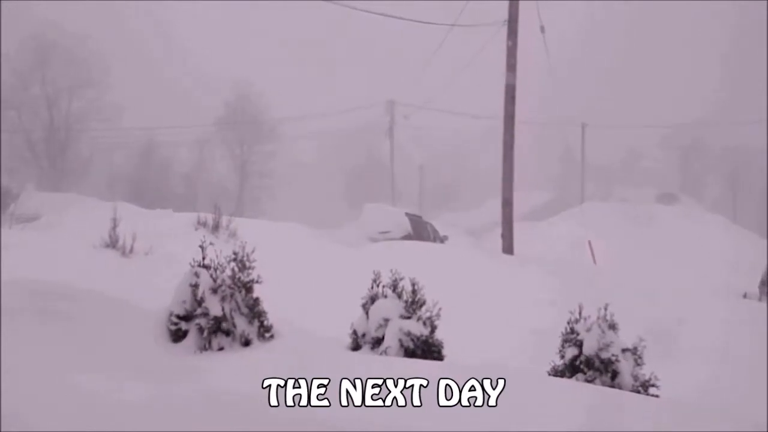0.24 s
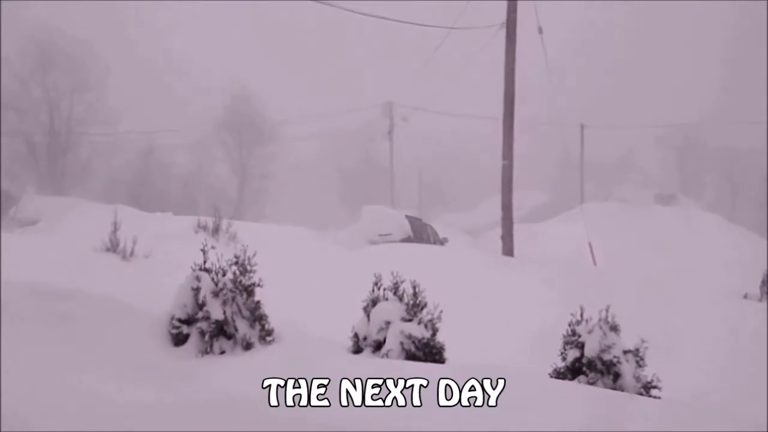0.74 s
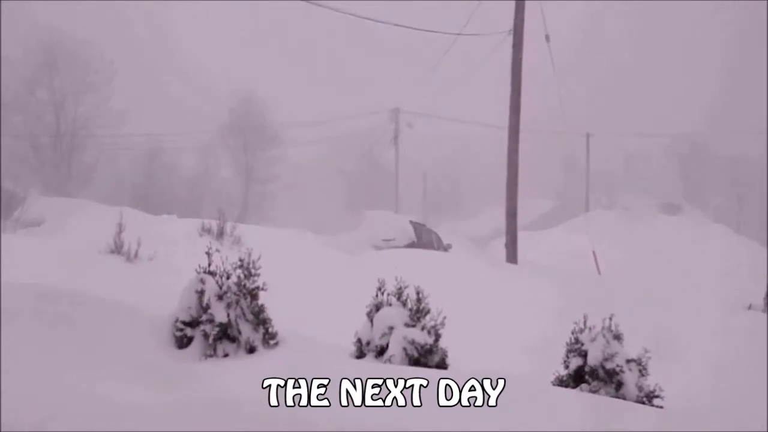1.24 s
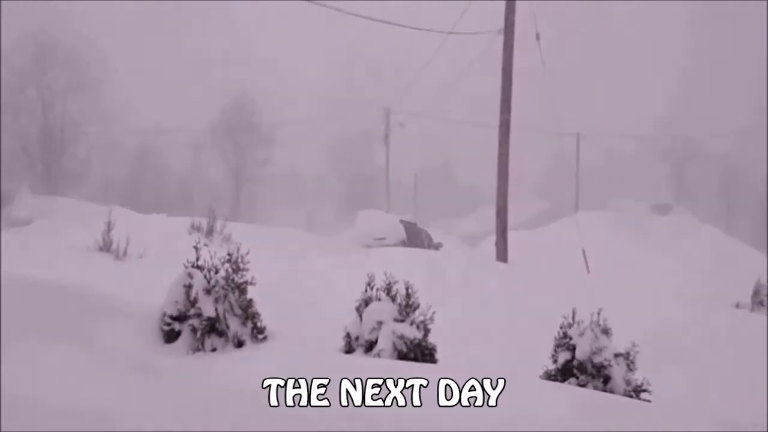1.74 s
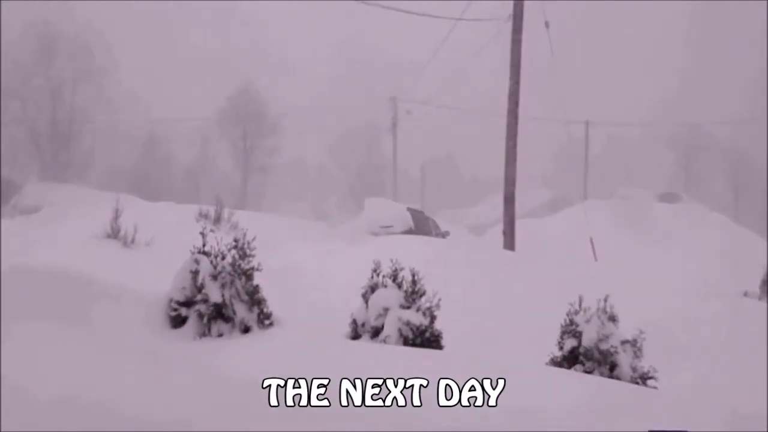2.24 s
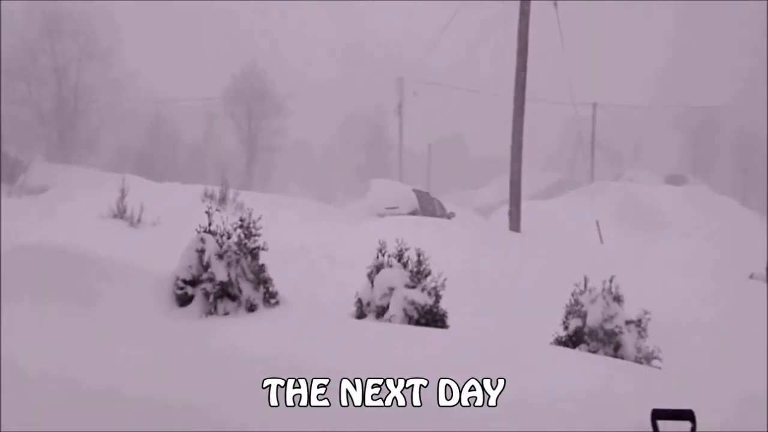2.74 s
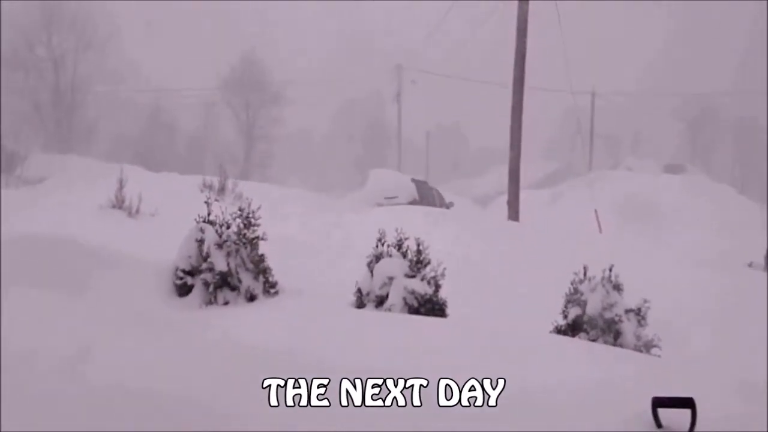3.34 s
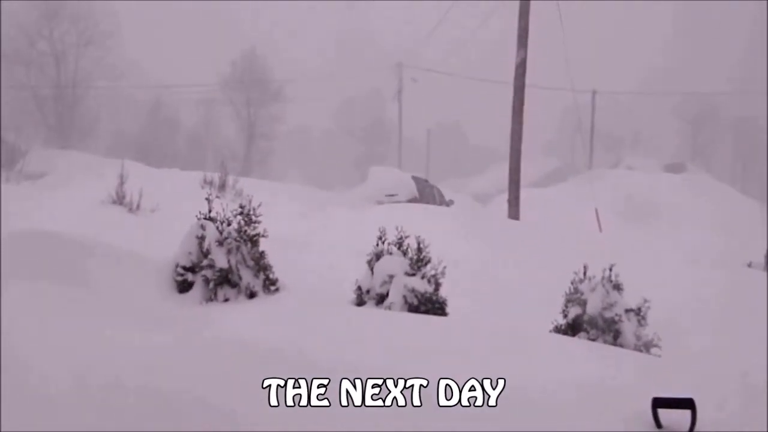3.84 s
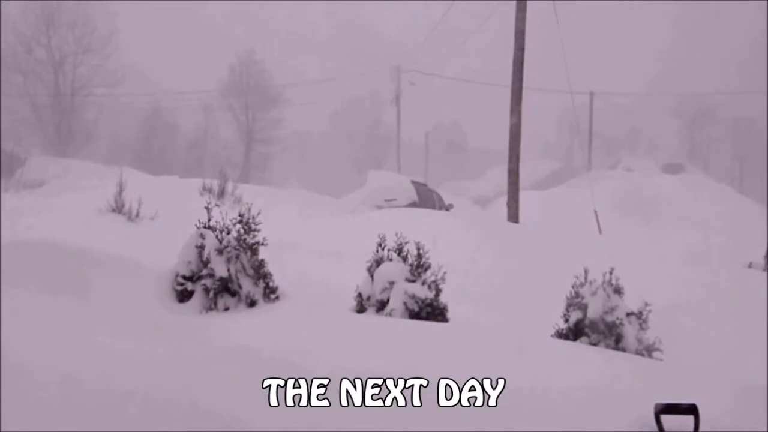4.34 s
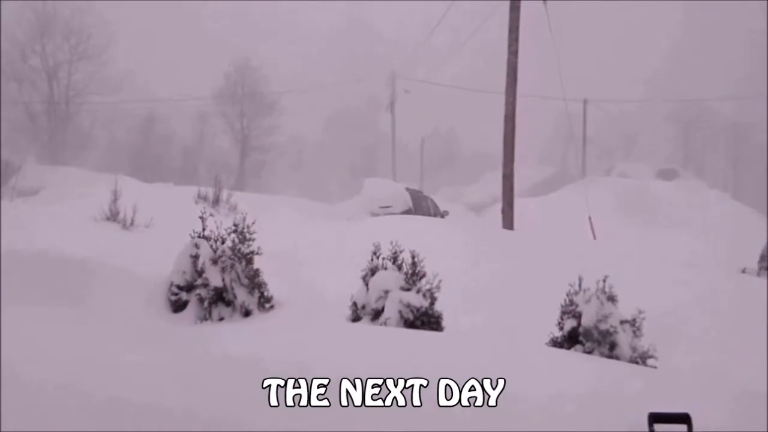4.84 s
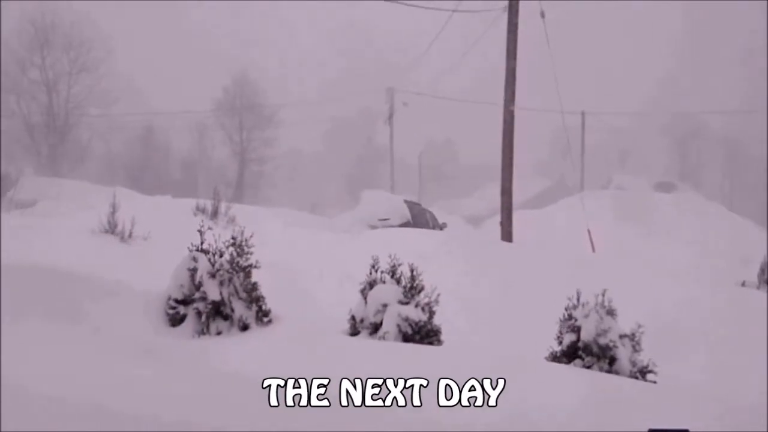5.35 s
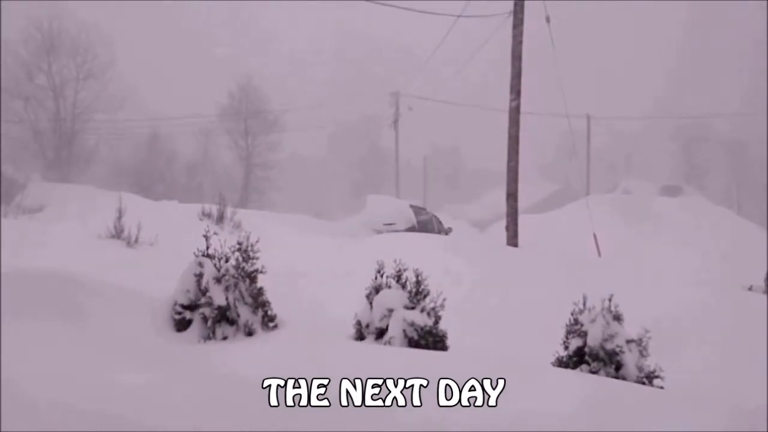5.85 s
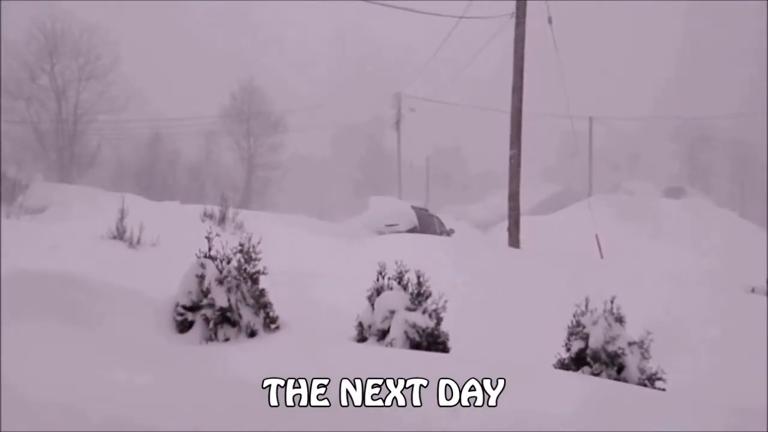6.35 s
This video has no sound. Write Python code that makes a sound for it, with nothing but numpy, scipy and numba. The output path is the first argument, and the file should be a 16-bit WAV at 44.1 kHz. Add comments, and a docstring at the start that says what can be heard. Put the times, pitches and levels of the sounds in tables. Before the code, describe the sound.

Wind buffets a bare hand-held microphone outdoors in a snowstorm. A low, fluttering rumble comes in irregular gusts, broken by dull thumps and short lulls. The hardest blasts come near the end, rasping and briefly crackling as they overload the microphone. Behind it, wind rushes softly in distant trees, with very faint whistles, rustles of blown snow and a fine hiss. Two tiny ticks sound on the camera body.

```python
"""Snowstorm on a bare microphone

Turbulent gusts rumble on the microphone port of a hand-held camera and single eddies thump it;
the hardest rasp at its edge and overload the input. Behind them wind rushes in distant trees,
vortex shedding whistles faintly and blown snow rustles past. Two small contacts ring the camera
body, and a fine hiss lies on top."""
import sys
import numpy as np
from scipy import signal
from scipy.fft import rfft, irfft
from scipy.io import wavfile
from scipy.ndimage import uniform_filter1d, minimum_filter1d
from numba import njit

SR = 44100
rng = np.random.default_rng(int(sys.argv[2]) if len(sys.argv) > 2 else 0)


def pcm_store(signal):
    """Save signal as 16-bit PCM."""
    levels = np.round(np.clip(np.atleast_2d(signal), -1, 1) * 32767)
    wavfile.write(sys.argv[1], SR, levels.astype(np.int16).T)


N = 291060


def undb(db):
    """Amplitude ratio of a level in decibels."""
    return 10 ** (np.asarray(db) / 20)


def unit(x):
    """Normalisation to rms 1."""
    return x / np.sqrt(np.mean(x ** 2) + 1e-20)


def curves(table):
    """Linear interpolation of each column of a timed table, one value a sample."""
    times, *columns = np.transpose(table)
    return [np.interp(np.arange(N) / SR, times, column) for column in columns]


def swell_at(s, width_s):
    """Gaussian envelope, down to 1/e at width_s either side of time s."""
    return np.exp(-np.minimum(((np.arange(N) / SR - s) / width_s) ** 2, 60))


def walk(rate_hz):
    """Band-limited random modulation of rms 1."""
    hz = np.arange(N // 2 + 1) * SR / N
    return unit(irfft(rfft(rng.standard_normal(N)) / (1 + (hz / rate_hz) ** 4), N))


def coloured(spectrum):
    """Spectral shaping of white noise by (f/Hz, level/dB) points, at rms 1."""
    hz, db = np.transpose(spectrum)
    bins = np.maximum(np.arange(N // 2 + 1) * SR / N, 1)
    gain = undb(np.interp(np.log(bins), np.log(hz), db))
    return unit(irfft(rfft(rng.standard_normal(N)) * gain, N))


def butter(x, hz, kind, order):
    """Maximally flat low-pass or high-pass filter."""
    return signal.sosfilt(signal.butter(order, min(hz, SR / 2 - 1), kind, fs=SR, output="sos"), x)


@njit
def lowpass(x, hz, damping):
    """Two-pole state-variable low-pass with a moving corner; light damping makes it resonate."""
    y, band, low = np.empty(len(x)), 0., 0.
    for i in range(len(x)):
        g = np.tan(np.pi * hz[i] / SR)
        v = (band + g * (x[i] - low)) / (1 + g * (g + damping))
        y[i] = low + g * v
        band, low = 2 * v - band, 2 * y[i] - low
    return y


def turbulence(corner_hz, bass_hz=52, steady_s=0.03):
    """Turbulent pressure: its spectrum falls ever more steeply past a corner set by the smallest whirls."""
    pressure = lowpass(rng.standard_normal(len(corner_hz)), corner_hz, damping=1.67)
    pressure = lowpass(pressure, corner_hz, damping=1.0)
    pressure = lowpass(pressure, 9.1 * corner_hz, damping=1.56)
    pressure = butter(pressure, bass_hz, "high", order=1)
    pressure = butter(pressure, 33, "high", order=2)
    # hold the strength even, so that the flow alone sets it
    size = int(steady_s * SR)
    local_power = uniform_filter1d(uniform_filter1d(pressure ** 2, size), size)
    return pressure / np.sqrt(local_power + 1e-18)


# gusts reaching the port: onset t/s, hold/s, relative level/dB, corner f/Hz
PORT_GUSTS = [(-0.013, 0.2, -28.5, 149.6), (0.337, 0.31, -30, 155), (0.655, 0.11, -39.5, 101.7),
              (0.906, 0.017, -26.5, 117), (1.098, 0.13, -22.5, 157), (1.283, 0.69, -24.5, 158),
              (1.509, 0.23, -24.5, 180), (1.77, 0.18, -32.5, 147.5), (2.133, 0.036, -29, 124.4),
              (2.417, 0.015, -21.5, 180.4), (2.69, 0.38, -25, 180), (2.906, 0.26, -22, 199.3),
              (3.129, 0.06, -24.5, 179), (3.237, 0.19, -24, 160.5), (3.458, 0.078, -23.5, 215),
              (3.734, 0.016, -26, 155), (3.811, 0.16, -25.5, 161.5), (4.286, 0.0092, -25, 143.4),
              (4.399, 0.064, -25.5, 158), (4.663, 0.24, -26, 156), (4.956, 0.48, -26.5, 154.6),
              (5.216, 0.079, -20, 196), (5.349, .22, -23, 188), (5.676, 0.26, -28.5, 152),
              (5.853, 0.18, -18, 267), (6.041, 0.25, -20, 203), (6.315, 0.14, -22.5, 72),
              (6.432, 0.059, -9.5, 119.3), (6.535, 0.11, -19.5, 207.4)]


def flow(attack_s=0.0051, release_s=0.026, lull_db=-44.5, lull_hz=120):
    """Incoherent addition: gusts and a steady lull sum in power, giving a level and a mean corner."""
    t = np.arange(N) / SR
    power = np.full(N, undb(lull_db) ** 2)
    weighted_hz = power * lull_hz
    for s, hold, db, corner_hz in PORT_GUSTS:
        rise = (1 + np.tanh((t - s) / attack_s)) / 2
        fall = np.exp(-np.maximum(t - s - hold, 0) / release_s)
        gust_power = (undb(db) * rise * fall) ** 2
        power += gust_power
        weighted_hz += gust_power * (lull_hz + (corner_hz - lull_hz) * np.sqrt(rise * fall))
    return 10 * np.log10(power), weighted_hz / power


def gusts(flutter_db=5.0, flutter_hz=32, brighten=0.44, port_db=-2.0, swirl_db=-24, swirl_share=0.3):
    """Flow noise at the port: small eddies modulate the rumble, each surge both louder and brighter."""
    db, corner_hz = flow()
    surge_db = flutter_db * np.tanh(walk(flutter_hz))
    rumble = turbulence(corner_hz * undb(brighten * surge_db)) * undb(db + surge_db + port_db)
    # the large slow whirls keep turning through the lulls
    swirl = turbulence(corner_hz=np.full(N, 70.)) * undb(swirl_share * db + swirl_db)
    return rumble + swirl


# strength of the wind in the trees: t/s, relative level/dB, offset of the snow hiss/dB
TREE_WIND = [(0, -53.5, -2), (.55, -56.5, -8.5), (.85, -55, -3.5), (1.5, -55, -4), (2.65, -53, -3.5),
             (3.3, -55, -3.5), (3.8, -55, -3), (4.4, -55, -3.5), (5.2, -54, -6.5), (5.8, -55, -2.5),
             (6.3, -53.5, -9.5), (6.6, -54, -3.5)]
# spectrum of that wind: f/Hz, relative density level/dB
TREE_SPECTRUM = [(100, 8), (300, 7), (550, 3), (800, 1), (1100, -1), (1600, -7), (2400, -10.5),
                 (3300, -14.5), (4600, -18), (7000, -25.5), (15000, -47.5)]


def trees(snow_hz=2400, gain_db=6.5):
    """Broadband aerodynamic noise: a far roar sways gently under flurries of hissing snow."""
    db, snow_db = curves(TREE_WIND)
    roar_sway_db, snow_sway_db = .8 * walk(rate_hz=5), 2.1 * walk(rate_hz=12)
    roar = butter(coloured(TREE_SPECTRUM), snow_hz, "low", order=2) * undb(roar_sway_db)
    snow = butter(coloured(TREE_SPECTRUM), snow_hz, "high", order=2) * undb(snow_db + snow_sway_db)
    return (roar + snow) * undb(db + gain_db)


# slow swell of the fine hiss: t/s, level/dB
HISS_SWELL = [(0, -70.5), (1.5, -68), (2.8, -68), (3.7, -65), (4.4, -68), (5.7, -67), (6.6, -65.5)]
# spectrum of the fine hiss: f/Hz, relative density level/dB
HISS_SPECTRUM = [(1000, -12), (5000, -7.5), (7000, -1.5), (10000, 2.5), (12500, 3.5), (15000, -1)]


def hiss(flutter_db=2.6, flutter_hz=14, grain_db=2.6, grain_hz=300):
    """Amplitude modulation of faint treble noise: the slow part is heard as flutter, the fast as grain."""
    db, = curves(HISS_SWELL)
    db += flutter_db * np.tanh(walk(flutter_hz))
    return coloured(HISS_SPECTRUM) * undb(db + grain_db * walk(grain_hz))


# contacts on the camera body: t/s, peak level/dB, corner f/Hz
BODY_CONTACTS = [(0.09, -31.5, 3260), (4.7944, -28, 10500)]
# modes of the camera body: f/Hz, relative level/dB, decay time T60/s
BODY_MODES = [(1314, 19, 0.0053), (1600, 8, 0.008), (2240, 4, 0.015), (2550, -1, 0.012),
              (3700, 8.5, 0.0056), (4250, 4, 0.0047), (6350, 4.5, 0.0065), (9960, 7, 0.005)]


def ticks(contact_s=0.0021, dry_share=0.52, low_hz=800):
    """Impact excitation: a gritty contact rings the body's damped modes; a softer one sounds duller."""
    out = np.zeros(N)
    t = np.arange(SR // 20) / SR
    ring = sum(undb(db) * np.sin(2 * np.pi * hz * t) * np.exp(-np.log(1000) * t / t60)
               for hz, db, t60 in BODY_MODES)
    for s, db, corner_hz in BODY_CONTACTS:
        contact = rng.standard_normal(len(t)) * np.exp(-t / contact_s)
        tick = unit(signal.fftconvolve(contact, ring)[:len(t)]) + dry_share * unit(contact)
        tick = butter(tick, corner_hz, "low", order=3)
        tick = butter(tick, low_hz, "high", order=2)
        at = int(s * SR)
        out[at:at + len(t)] += undb(db) * tick / np.abs(tick).max()
    return out


# the hardest single eddies: centre t/s, level/dB, length/s, nominal corner f/Hz
PORT_EDDIES = [(0.143, -24, .012, 214.4), (0.174, -13, .007, 227), (0.254, -21, .01, 131),
               (0.295, -6.5, .015, 201), (0.32, -11.5, 0.017, 110), (0.333, -3, 0.0094, 341),
               (0.344, -5, 0.013, 358), (0.396, -14, .008, 190.4), (0.447, -21, .008, 262),
               (0.51, -18.5, 0.019, 245), (1.108, -5.5, 0.0092, 161.4), (1.148, -10.5, .017, 161),
               (1.173, -8.5, .011, 195), (1.21, -14.5, 0.014, 147), (1.436, -14.5, 0.012, 250),
               (1.466, -22, 0.041, 113.4), (1.531, -6, 0.02, 205), (1.556, -7.5, .014, 200.6),
               (1.578, -5, .015, 202), (1.603, -12.5, .014, 180), (1.63, -11.5, 0.0082, 300),
               (1.654, -16, 0.0075, 272), (1.69, -14, .011, 269), (1.881, -13, 0.026, 230),
               (1.896, -15.5, .01, 255), (1.953, -18.5, 0.025, 165.5), (2.373, -22, .015, 113.4),
               (2.438, -15.5, .018, 212.4), (2.686, -15, 0.011, 205), (2.73, -15, 0.014, 220),
               (2.762, -24, .01, 225), (2.87, -15, .012, 190.4), (2.948, -13, 0.013, 329),
               (2.967, -10.5, 0.011, 305), (3.008, -5.5, 0.0031, 247), (3.026, -8, 0.013, 255),
               (3.049, -13, .016, 276), (3.067, -5.5, .008, 194), (3.088, -8, 0.007, 297),
               (3.111, -7.5, .0092, 249), (3.129, -15.5, .007, 287), (3.154, -14, 0.022, 290),
               (3.274, -16.5, 0.019, 140), (3.324, -11.5, 0.0068, 219), (3.37, -9, 0.01, 225),
               (3.437, -7.5, .008, 344), (3.449, -15.5, 0.018, 322), (3.489, -16.5, 0.0068, 337),
               (3.502, -8, .007, 340), (3.52, -10, 0.016, 309), (3.562, -19.5, .01, 204),
               (3.744, -23, 0.018, 185), (3.9, -18.5, 0.017, 192.5), (3.977, -17.5, .012, 184.5),
               (4.039, -22.5, 0.027, 147.4), (4.31, -23.5, .014, 158), (4.405, -8, 0.014, 161),
               (4.466, -21.5, 0.0088, 140.7), (4.669, -15.5, 0.011, 189), (4.725, -28, 0.0073, 164.4),
               (4.789, -14, 0.008, 150), (4.837, -13, 0.0065, 216), (4.878, -20.5, 0.0084, 172),
               (5.024, -8, .012, 271), (5.127, -15.5, 0.025, 165.7), (5.22, -13, .008, 247),
               (5.239, -5, 0.007, 239), (5.256, -13.5, 0.028, 271), (5.27, -10.5, 0.009, 246),
               (5.341, -17.5, 0.011, 254.5), (5.397, -7, 0.012, 164), (5.419, -15.5, .009, 168.3),
               (5.457, -15, .012, 235), (5.501, -7.5, 0.023, 245), (5.574, -10, 0.0068, 206),
               (5.744, -30.5, .012, 169), (5.878, -7, .012, 337), (5.901, -8, 0.0077, 328),
               (5.911, -4, 0.0042, 320), (5.934, -2, 0.017, 284), (5.949, -3.5, 0.017, 405),
               (5.968, -2, 0.011, 304), (5.993, -2, 0.017, 420), (6.012, -6.5, 0.008, 340),
               (6.052, -9.5, 0.0082, 260), (6.101, -9.5, .008, 285), (6.118, -13.5, .006, 234),
               (6.131, -6, 0.0043, 237), (6.149, -11.5, .008, 262), (6.215, -2, 0.0099, 200),
               (6.232, -17, .012, 225), (6.257, -4, .007, 217), (6.273, -6.5, 0.013, 190),
               (6.466, -7, 0.027, 267), (6.572, -15, .012, 303)]


def eddies(spread=0.38, edge_share=0.8, core_share=0.25, top_ratio=2.09):
    """A passing vortex: a few swings of pressure that grow, quicken at its core and slow again."""
    out = np.zeros(N)
    t = np.arange(-SR // 8, SR // 8) / SR
    for s, db, length, corner_hz in PORT_EDDIES:
        swell = 1 / np.cosh(t / (spread * length))
        thump = swell * turbulence(corner_hz * (edge_share + core_share * swell), steady_s=0.022)
        # filtered backwards, so the filter's tail leads into the thump
        thump = butter(thump[::-1], top_ratio * corner_hz, "low", order=2)[::-1]
        thump *= undb(db) * np.sqrt(np.sum(swell ** 2) / np.sum(thump ** 2))
        at = int(s * SR) + np.arange(len(t)) - len(t) // 2
        inside = (at >= 0) & (at < N)
        out[at[inside]] += thump[inside]
    return out


# overloads of the microphone: t/s, level before filtering/dB, corner f/Hz
OVERLOADS = [(0.297, -16.5, 2400), (0.312, -27, 4500), (0.332, -18.5, 3200), (3.501, -35, 1500),
             (3.518, -19, 5000), (5.026, -20.5, 8000), (5.878, -20.5, 3500), (5.933, -11.5, 3500),
             (5.9364, -19, 4000), (5.9473, -12, 5000), (5.953, -9.5, 2000), (5.9998, -23, 3800),
             (6.257, -20, 5000), (6.4565, -13.5, 3800)]


def crackles(width_s=0.00028, low_hz=310):
    """Overload distortion: each listed overload puts a sharp kink of either sign in the wave."""
    out = np.zeros(N)
    t = np.arange(-SR // 50, SR // 50) / SR
    kink = butter(np.exp(-np.abs(t) / width_s), low_hz, "high", order=2)
    for s, db, corner_hz in OVERLOADS:
        at = int(s * SR) - len(t) // 2
        out[at:at + len(t)] += rng.choice([-1, 1]) * undb(db) * butter(kink, corner_hz, "low", order=1)
    return out


# rustles, probably blown snow brushing past: centre t/s, half-width/s, centre f/Hz, level/dB
SNOW_RUSTLES = [(0.315, 0.012, 2600, -52), (2.136, 0.018, 2470, -59), (2.598, 0.026, 4200, -65),
                (2.717, 0.038, 3860, -63), (3.747, 0.018, 5300, -65), (6.269, 0.057, 5060, -62.5),
                (6.455, 0.019, 4570, -59.5)]


def rustles(edge_ratio=1.22, grain_db=3, grain_hz=220):
    """Granular noise: dense tiny grains merge into a band that swells and is gone."""
    out = np.zeros(N)
    grains = rng.standard_normal(N) * undb(grain_db * walk(grain_hz))
    for s, width_s, hz, db in SNOW_RUSTLES:
        band = butter(grains, hz / edge_ratio, "high", order=4)
        band = butter(band, hz * edge_ratio, "low", order=8)
        out += unit(band) * undb(db) * swell_at(s, width_s)
    return out


# rasps at the edge of the port: centre t/s, half-width/s, level/dB, top f/Hz
PORT_RASPS = [(0.319, 0.004, -47, 1300), (0.34, 0.0071, -47, 1700), (1.633, 0.005, -45.5, 1250),
              (1.693, 0.004, -56, 1200), (3.323, 0.003, -50, 1500), (3.443, 0.0044, -42.5, 1800),
              (3.502, 0.003, -41, 1350), (3.528, 0.014, -46, 1270), (5.02, 0.005, -46.5, 1720),
              (5.232, 0.0075, -42.5, 1700), (5.507, 0.003, -43, 1400), (5.937, 0.004, -45, 2400),
              (5.944, 0.003, -38, 2000), (5.955, 0.003, -40, 2400), (5.976, 0.0097, -38.5, 1650),
              (6.002, 0.005, -46, 2500), (6.006, 0.0097, -41, 1800), (6.038, 0.006, -49.5, 1200),
              (6.103, 0.0021, -44.5, 1870), (6.134, 0.0024, -41, 1860), (6.146, 0.0053, -44, 1600),
              (6.26, 0.0035, -49, 2200), (6.464, 0.011, -37, 1450), (6.576, 0.006, -51, 1300)]


def rasps(wind, low_hz=800, fast_hz=260, grit=0.47):
    """Flow separation: air tears at the port's edge in spurts that follow the swings of pressure."""
    swing_power = butter(wind, fast_hz, "high", order=2) ** 2
    mean_power = uniform_filter1d(swing_power, size=441)
    spurts = (swing_power / (mean_power + 1e-12)) ** (grit / 2)
    tearing = butter(rng.standard_normal(N) * spurts, low_hz, "high", order=4)
    return sum(unit(butter(tearing, top_hz, "low", order=8)) * undb(db) * swell_at(s, width_s)
               for s, width_s, db, top_hz in PORT_RASPS)


# whistles, probably in wires and twigs: centre t/s, length/s, f/Hz, level/dB
AEOLIAN_TONES = [(3.685, 0.11, 3020, -62), (3.92, 0.12, 2830, -66), (4.657, 0.17, 2145, -63.5),
                 (4.912, 0.21, 2150, -64), (5.148, 0.048, 2610, -64.5), (5.197, 0.19, 2160, -60.5),
                 (6.35, 0.23, 2200, -61)]


def whistles(flare_db=6, flare_hz=14, tremble_share=0.05, tremble_hz=18):
    """Vortex shedding from thin things: a narrow, breathy band trembles in pitch, flares and breaks up."""
    out = np.zeros(N)
    tremble = 1 + tremble_share * np.tanh(walk(tremble_hz))
    flare = undb(flare_db * np.tanh(walk(flare_hz)))
    air = butter(rng.standard_normal(N), 2300, "high", order=1)
    for s, length, hz, db in AEOLIAN_TONES:
        tone = lowpass(air, hz * tremble, damping=0.05)
        out += unit(tone * flare) * undb(db) * swell_at(s, length) ** 2
    return out


def scene():
    """Superposition, in one channel, of wind on the port, the storm behind it, ticks and hiss."""
    wind = gusts() + eddies()
    storm = trees() + whistles() + rustles()
    return (wind + rasps(wind) + crackles() + storm + ticks() + hiss())[None]


@njit
def limiter_gain(x, ceiling, release):
    """Peak detection: the gain drops at once when a swing passes the ceiling, then recovers."""
    gain, peak = np.empty(len(x)), 0.
    for i in range(len(x)):
        peak = max(abs(x[i]), peak * release)
        gain[i] = ceiling / max(peak, ceiling)
    return gain


def record(dry, ceiling=.7, release_s=0.03, smooth_samples=32, top_hz=15400):
    """Peak and band limiting: the hardest swings are held down and a steep low-pass cuts the top."""
    gain = limiter_gain(dry[0], ceiling, np.exp(-1 / (release_s * SR)))
    # widen each dip in gain, then round its edges
    gain = minimum_filter1d(gain, 2 * smooth_samples)
    gain = uniform_filter1d(uniform_filter1d(gain, smooth_samples), smooth_samples)
    top_cut = signal.ellip(10, .2, 80, top_hz, fs=SR, output="sos")
    return signal.sosfilt(top_cut, dry * gain)


dry = scene()
out = record(dry)
pcm_store(out)
```